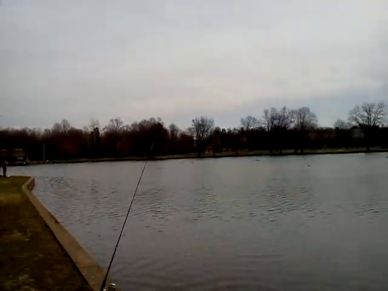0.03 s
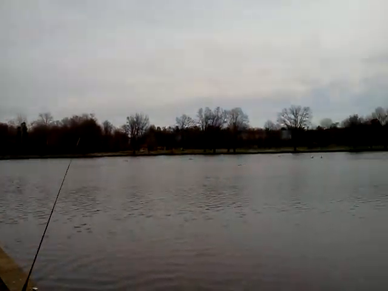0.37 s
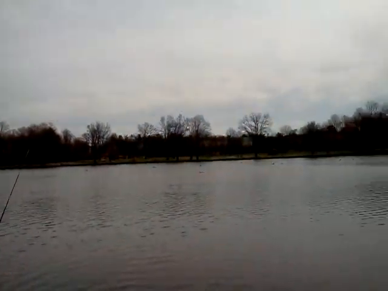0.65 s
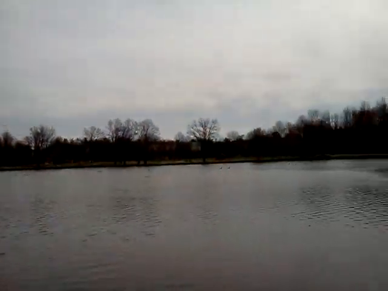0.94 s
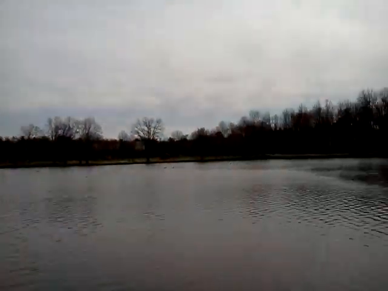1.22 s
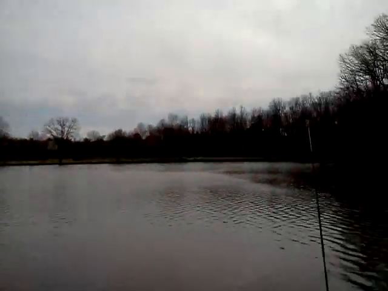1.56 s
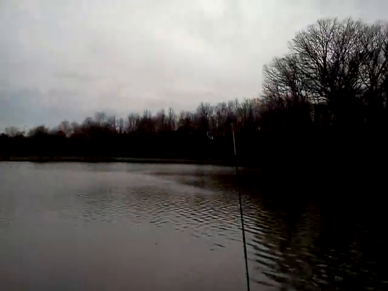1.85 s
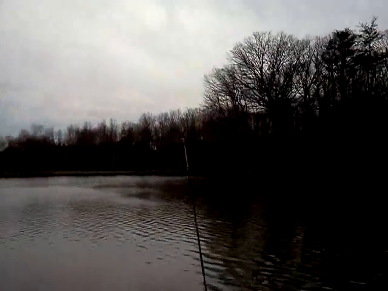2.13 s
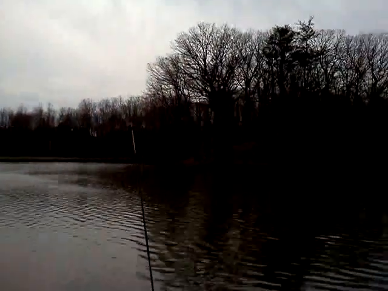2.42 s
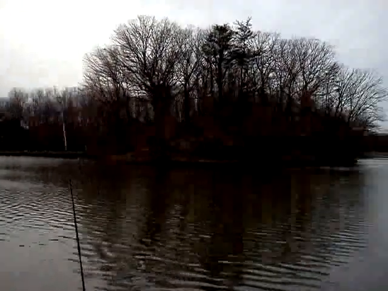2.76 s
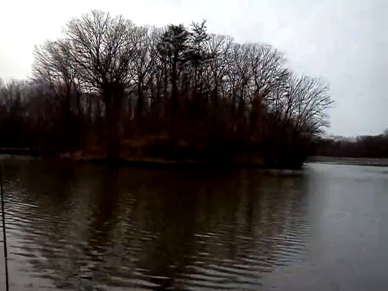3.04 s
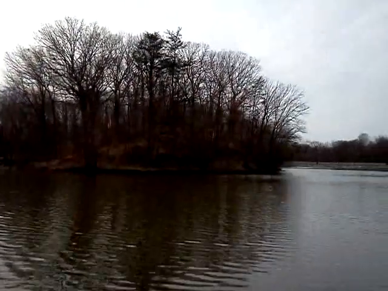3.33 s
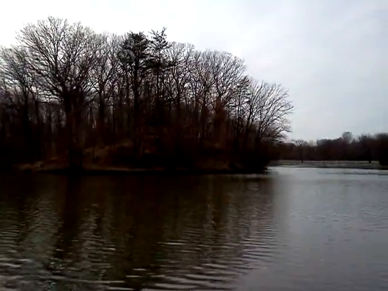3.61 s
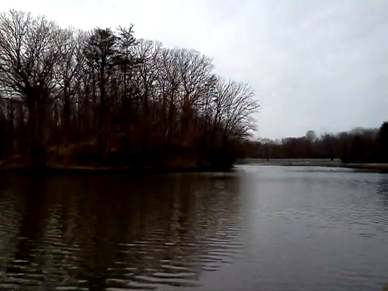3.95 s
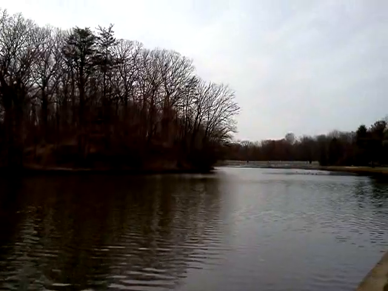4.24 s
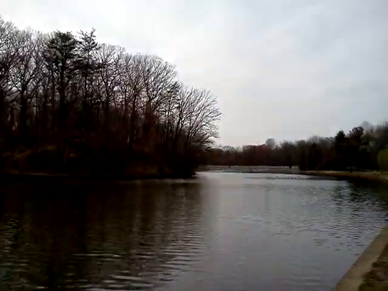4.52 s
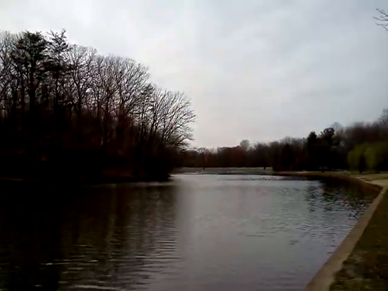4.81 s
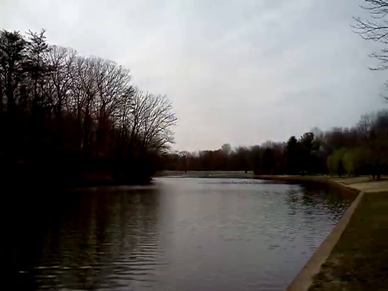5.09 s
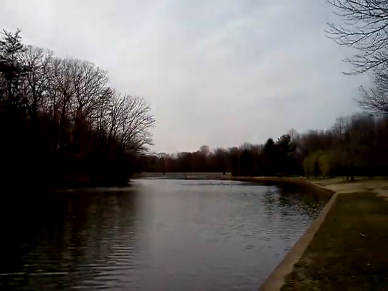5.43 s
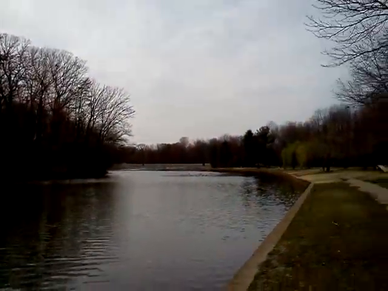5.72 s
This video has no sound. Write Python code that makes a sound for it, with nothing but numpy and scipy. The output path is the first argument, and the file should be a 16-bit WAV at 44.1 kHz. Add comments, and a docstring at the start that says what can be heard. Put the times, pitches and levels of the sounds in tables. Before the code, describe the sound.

Geese honk across a pond, two close and a flock farther off, while wind gusts buffet the microphone.

```python
"""Geese honk across a pond: two near birds trade clear falling honks, a deeper one draws out long calls,
and the flock answers and grunts from farther off. Each voice is a source and a filter: harmonics of
the syrinx, shaped by the throat. The wooded banks reflect the calls over a steady murmur, and there
is one faint tick. Turbulent wind buffets the microphone at the start and again near the end, where
it overloads and crackles."""
import sys
import numpy as np
from scipy import signal
from scipy.fft import rfft, irfft
from scipy.io import wavfile

SR = 44100
rng = np.random.default_rng(int(sys.argv[2]) if len(sys.argv) > 2 else 0)


def wav_record(signal):
    """Record a signal, one row per channel, as 16-bit PCM in the file named by sys.argv[1]."""
    frames = np.transpose(np.atleast_2d(signal))
    bounded = np.clip(frames, -1, 1)
    # unit amplitude maps onto the largest positive 16-bit level
    quanta = np.round(bounded * 32767).astype(np.int16)
    wavfile.write(sys.argv[1], SR, quanta)


N = 263040
TIME = np.arange(N) / SR

# honks of the near pair: start_s, length_s, pitch_hz, level_db, sag_fraction, fade_db, treble_db, bird
NEAR_HONKS = [ (0.088, .076, 680, -14, .068, 6.5, 10.5, "round"),
              (0.549, .072, 683.6, -14, 0.034, 2, -5, "round"),
              (1.211, 0.089, 651.2, -13.5, .048, 13, 3, "brassy"),
              (1.726, .087, 659.6, -12, .045, 10, -4, "brassy"),
              (2.3, 0.091, 679.2, -14, .02, 2.5, -3, "round"),
              (3.092, .106, 669.8, -16, .028, 2, -3, "round"),
              (3.508, .076, 687, -19.5, 0.021, -3, 6.5, "round"),
              (4.173, .083, 656, -12.5, 0.054, 9, -6.5, "brassy"),
              (4.621, 0.076, 659.3, -13.5, .008, 5, 2.5, "round")]
# calls of the deep goose: start_s, length_s, low_note_s, level_db, treble_db
LONG_CALLS = [(3.685, 0.24, .11, -28, -13), (4.728, 0.14, .064, -23, -8), (5.388, .23, .076, -21.5, 15.5)]
# short calls of the flock: start_s, length_s, pitch_hz, level_db
FLOCK_ANSWERS = [ (0.176, .07, 652.4, -45), (0.262, .075, 757, -30.5), (0.479, 0.03, 680, -21),
                 (0.500, 0.061, 593, -29), (0.684, 0.038, 685.3, -25), (0.818, .065, 506.5, -33),
                 (0.938, 0.087, 604, -38.5), (1.424, 0.082, 756, -24), (1.504, 0.088, 666, -36.5),
                 (1.628, .065, 635, -28), (1.814, 0.064, 692, -26.5), (2.143, 0.055, 661.5, -33.5),
                 (2.222, 0.024, 666, -24.5), (2.23, .07, 760.7, -22), (2.433, 0.1, 681.3, -32.5),
                 (2.526, 0.11, 699, -33), (2.611, 0.13, 677.4, -35), (2.697, 0.042, 465.4, -31),
                 (2.741, .046, 612, -28), (2.879, 0.046, 656, -37), (3.02, 0.018, 648, -26.5),
                 (3.122, 0.079, 754, -26), (3.16, 0.051, 492.4, -34), (3.238, .049, 705, -24.5),
                 (3.431, 0.044, 768, -29.5), (3.498, 0.036, 588, -24), (3.559, .035, 667, -23),
                 (4.091, 0.1, 633, -27.5), (4.254, .041, 427.6, -31.5), (4.319, .061, 626, -28),
                 (4.555, 0.028, 645, -27.5), (4.829, 0.052, 698.6, -27), (5.386, .016, 620, -26.5),
                 (5.415, 0.075, 681, -35.5), (5.841, .063, 693, -36), (5.896, 0.05, 764, -36.5)]
FLOCK_GRUNTS = [(0.01, .035, 655, -34.5), (0.805, 0.035, 661, -31.5), (1.124, .05, 568.3, -32.5),
                (1.584, .06, 464, -32), (2.499, .06, 612, -30), (3.034, 0.073, 549, -30),
                (3.437, 0.038, 581, -30.5), (3.922, 0.036, 644, -30.5), (4.283, .092, 657, -34.5)]
# throat filters: frequency_hz, relative_gain_db
ROUND_THROAT = [(550, -9.5), (670, -15), (1000, -7), (1300, 4), (1450, -6), (1850, -14), (2030, -25),
                (2400, -33), (2700, -55.5), (3100, -42), (3350, -40), (3550, -45.5), (4000, -65.5)]
BRASSY_THROAT = [(550, -7.5), (650, -18.5), (1000, -2.5), (1300, 1), (1700, -7), (1930, -16), (2250, -30.5),
                 (2560, -24), (2750, -36), (3250, -44), (3850, -65.5), (4500, -77)]
DEEP_THROAT = [(430, -1.5), (500, -11), (900, 8.5), (1000, 3.5), (1480, -2.5), (1980, -21), (2500, -43),
               (3000, -44), (3400, -55.5), (4500, -68.5)]
FLOCK_THROAT = [(450, -3.5), (680, -9.5), (780, -12), (1000, 11.5), (1330, 1.5), (1520, 7), (1750, -19),
                (2050, -25.5), (2400, -41.5), (3300, -49.5), (4500, -58.5)]
# band over which a call's treble lift comes in: lower_hz, upper_hz
TREBLE_RAMP_HZ = [1510, 2975]
# air rasping through the syrinx: frequency_hz, relative_density_db
RASP_SPECTRUM = [(150, -29.5), (400, -14), (600, -13.5), (1300, 4.5), (1650, 0.5), (2100, -4),
                 (2800, -16.5), (3400, -20), (4000, -26)]
# loudness contour of the far flock, taken relative to its mean: time_s, level_db
FAR_CONTOUR = [(0.0, -37), (1.19, -38), (1.38, -37.5), (2.11, -38), (2.42, -34), (2.95, -38), (3.19, -37),
               (4.81, -34), (4.95, -42.5), (5.96, -38.5)]
# reflections from the shore and banks: delay_s, gain_db
BANK_ECHOES = [(0.024, -25), (0.086, -25.5), (0.171, -25.5), (.27, -22.5), (0.429, -29)]
# gusts of wind: start_s, peak_s, peak_db, decay_s
GUSTS = [(0.084, 0.142, -34.5, 0.011), (0.294, 0.337, -24, 0.02), (0.696, 0.729, -20.5, 0.016),
         (0.792, 0.84, -31, 0.083), (4.495, 4.662, -18.5, 0.024), (4.853, 5.176, -10.5, 0.061),
         (5.332, 5.52, -29.5, .2), (5.69, 5.815, -19.5, 0.019)]
# strongest eddies hitting the microphone port: start_s, peak_db, swell_s
BUFFETS = [ (0.049, -30, 0.0022), (0.159, -26.5, 0.0033), (0.229, -25, 0.0035), (0.324, -9.5, 0.0016),
           (0.407, -17, 0.0026), (0.461, -16, 0.0035), (0.608, -4.5, 0.0015), (0.736, -14, 0.0034),
           (0.808, -16.5, 0.0023), (0.842, -16, .0034), (0.98, -25.5, 0.0027), (1.018, -24.5, 0.0039),
           (2.986, -27, 0.0021), (3.999, -13, 0.002), (4.411, -20.5, 0.0023), (4.49, -17, 0.0027),
           (4.561, -17.5, 0.0058), (4.622, -10.5, 0.0069), (4.815, -19, 0.002), (4.856, -2.2, .0018),
           (4.952, -3.2, .0022), (5.058, -4.5, .003), (5.113, -6, .002), (5.164, 1.5, .011),
           (5.202, -3, .003), (5.004, -10, 0.0016), (5.031, -7, .0025), (5.396, -19, 0.0042),
           (5.611, -11.5, 0.0013), (5.671, -16.5, 0.0033), (5.720, -6.5, 0.002), (5.805, -11.5, 0.006)]
# turbulence, and the finer whirls of hard gusts: frequency_hz, relative_density_db
TURBULENCE_SPECTRUM = [(25, -33), (60, -15.5), (120, -21.5), (190, -1), (270, 1), (350, -2), (500, -10),
                       (700, -33), (1000, -34.5), (2000, -46), (3500, -53)]
WHIRL_SPECTRUM = [(200, -38), (450, 13.5), (700, 2), (1000, -17.5), (1500, -30.5), (3500, -44.5)]
# a dry tick: frequency_hz, relative_density_db
TICK_SPECTRUM = [(500, -15), (1500, 23), (2400, 16), (4000, -6.5)]
# the farthest birds blended with open air: frequency_hz, relative_density_db
MURMUR_SPECTRUM = [(18, -74.5), (30, -33), (136, -28), (280, -18), (384, -22.5), (467, -12), (546, -17.5),
                   (651, -9), (840, -16), (1110, -9.5), (1320, -7), (1540, -13), (1670, -18.5),
                   (2720, -38.5), (3250, -33), (4220, -61.5), (7150, -120)]


def near_goose(name, throat, attack_s=.0065, release_s=.032):
    """Coupled pitch and amplitude modulation: a honk scoops up, sags, then collapses in both."""
    out = np.zeros(N)
    for start, length, pitch, level, sag, fade, treble, bird in NEAR_HONKS:
        if bird != name:
            continue
        t = span(start, length)
        age = t - start
        opening = np.exp(-age / attack_s)
        closing = np.clip(1 - (length - age) / release_s, 0, 1) ** 1.4
        glide = 1 - .015 * opening - sag * age / length - .092 * closing
        envelope_db = level - 10 * opening - fade * age / length - 11 * closing
        tone = voice(t, pitch * glide, shelve(throat, treble), jitter=.0039, shimmer=.013, edge_s=.0021)
        add(out, t, tone * from_db(envelope_db))
    return out


def voice(t, pitch_hz, throat, jitter, shimmer, edge_s):
    """Source and filter: the throat weights eight harmonics of the syrinx, whose cycles are unsteady."""
    pitch_hz = pitch_hz * (1 + jitter * flutter(t, 420))
    phase = 2 * np.pi * np.cumsum(pitch_hz) / SR
    harmonic = np.arange(1, 9)[:, None]
    gains = from_db(at_hz(throat, np.maximum(harmonic * pitch_hz, 1)))
    gains /= np.sqrt(np.sum(gains ** 2, axis=0) / 2)  # unit rms
    offsets = rng.uniform(0, 2 * np.pi, harmonic.shape)
    tone = np.sum(gains * np.sin(harmonic * phase + offsets), axis=0)
    gate = np.clip(np.minimum(t - t[0], t[-1] - t) / edge_s, 0, 1)
    return tone * gate * (1 + shimmer * flutter(t, 500))


def shelve(throat, treble_db):
    """Shelving filter: lifts or lowers the upper part of a throat's response."""
    return [(hz, db + treble_db * np.interp(hz, TREBLE_RAMP_HZ, [0, 1])) for hz, db in throat]


def with_rasp(calls, level_db):
    """Pulse-modulated noise: each pulse of a call lets a puff of rough air through the throat."""
    puffs = np.maximum(calls, 0) * rng.standard_normal(N)
    return calls + colour(puffs, RASP_SPECTRUM) * from_db(level_db)


def deep_goose(low_hz=440, high_hz=500, break_s=.011, sag_hz_per_s=61, fade_db_per_s=31.5):
    """Register break: a soft low note jumps to a louder, higher one that slowly sags and fades."""
    out = np.zeros(N)
    for start, length, low_note_s, level, treble in LONG_CALLS:
        t = span(start, length)
        since_break = t - start - low_note_s
        high = .5 + .5 * np.tanh(since_break / break_s)
        held_s = np.maximum(since_break, 0)
        slack = np.exp(-np.minimum(t - start, t[-1] - t) / .012)  # both ends are lower and softer
        pitch = low_hz + (high_hz - low_hz) * high - sag_hz_per_s * held_s - 24 * slack
        envelope_db = level - 8 * (1 - high) - fade_db_per_s * held_s - 12 * slack
        tone = voice(t, pitch, shelve(DEEP_THROAT, treble), jitter=.007, shimmer=.08, edge_s=.004)
        add(out, t, tone * from_db(envelope_db))
    return out


def flock(fall_per_s=.8, croak_lead_s=.033, croak_overlap_s=.014):
    """Superposition of answers, grunts and the low croak that leads into each near honk and answer."""
    out = np.zeros(N)
    for start, length, pitch, level in FLOCK_ANSWERS:
        t = span(start, length)
        add(out, t, flock_honk(t, pitch, fall_per_s * length) * from_db(level))
    for start, length, pitch, level in FLOCK_GRUNTS:
        t = span(start, length)
        add(out, t, grunt(t, pitch) * from_db(level))
    for calls, croak_db in ((NEAR_HONKS, -10.5), (FLOCK_ANSWERS, -14)):
        for start, _, pitch, level, *_ in calls:
            t = span(start - croak_lead_s, croak_lead_s + croak_overlap_s)
            croak = grunt(t, .81 * pitch) * np.linspace(0, 1, len(t))
            add(out, t, croak * from_db(level + croak_db))
    return out


def flock_honk(t, pitch_hz, fall_fraction):
    """Frequency glide: a short call scoops up to its pitch, then falls as it fades."""
    progress = np.linspace(0, 1, len(t))
    glide = 1 - .025 * np.exp(-7 * progress) - fall_fraction * progress ** 3
    tone = voice(t, pitch_hz * glide, FLOCK_THROAT, jitter=.008, shimmer=.14, edge_s=.005)
    return tone * from_db(-5 * progress ** 3)


def grunt(t, pitch_hz):
    """Aperiodic vibration: cycles very uneven in period and amplitude sound hoarse."""
    return voice(t, pitch_hz, FLOCK_THROAT, jitter=.045, shimmer=.38, edge_s=.012)


def far_flock(count=90, lowest_hz=645, spread_hz=150):
    """Attenuation with distance: birds call in loose turns, the farther ones fainter."""
    out = np.zeros(N)
    for turn, (when, size, register, distance) in enumerate(rng.random((count, 4))):
        t = span((turn + when) / count * N / SR, .05 + .06 * size)
        call = flock_honk(t, lowest_hz + spread_hz * register, fall_fraction=.07)
        add(out, t, call * from_db(-38 - 15.5 * distance))
    return out


def far_activity():
    """Slow amplitude modulation: the gain of the far flock as it livens up and settles."""
    level_db = np.interp(TIME, *np.transpose(FAR_CONTOUR))
    return from_db(level_db - level_db.mean())


def bank_reflections(calls, decay_db_per_s=60, scatter_db=-15):
    """Reflection and scattering: distinct echoes from the shore and a diffuse tail from the trees."""
    t = span(0, .78)
    response = rng.standard_normal(len(t)) * from_db(-decay_db_per_s * t) * np.minimum(t / .03, 1)
    response *= from_db(scatter_db) / np.linalg.norm(response)
    for delay, gain_db in BANK_ECHOES:
        add(response, [delay], from_db([gain_db]))
    return signal.fftconvolve(calls, response)[:N]


def wind(eddy_count=130, eddy_swell_s=.0075):
    """Turbulent pressure at the microphone: gusts carry a rumble, small eddies and hard buffets."""
    gust = gust_envelope()
    gust_db = 20 * np.log10(gust + 1e-9)
    eddies = [(when * N / SR, gust_db[int(when * N)] - 4.5 + 7 * size, eddy_swell_s)
              for when, size in rng.random((eddy_count, 2))]
    small_thumps, _ = thumps(eddies)
    hard_thumps, push = thumps(BUFFETS)
    force = gust * from_db(2 * flutter(TIME, 70)) + .1 * push
    rumble = force * noise(TURBULENCE_SPECTRUM)
    whirls = from_db(2) * force ** 1.845 * noise(WHIRL_SPECTRUM)
    # soft saturation rounds these peaks, so the overload comes with the hard thumps
    rounded = .55 * np.tanh((rumble + whirls + small_thumps) / .55)
    return signal.sosfilt(signal.butter(2, 75, "high", fs=SR, output="sos"), rounded + hard_thumps)


def gust_envelope(onset_s=.0027, build_db=12):
    """Exponential growth and decay: each gust sets in abruptly, builds to a peak and dies away."""
    envelope = np.zeros(N)
    for start, peak_s, peak_db, decay_s in GUSTS:
        onset = np.clip((TIME - start) / onset_s, 0, 1)
        build = from_db(peak_db + np.interp(TIME, [start, peak_s], [-build_db, 0]))
        decay = np.exp(-np.maximum(TIME - peak_s, 0) / decay_s)
        envelope += onset * build * decay
    return envelope


def thumps(eddies, full_scale_hz=297.2, hz_per_db=3):
    """Damped oscillation: each eddy thumps, weaker ones lower. Returns the sound and its envelope."""
    sound, force = np.zeros(N), np.zeros(N)
    for start, level, swell_s in eddies:
        t = span(start, .08)
        age = t - start
        push = from_db(level) * age / swell_s * np.exp(1 - age / swell_s)
        settled_hz = full_scale_hz + hz_per_db * level
        cycles = settled_hz * (age + .0016 * (1 - np.exp(-age / .0019)))  # starts high, then drops
        add(sound, t, push * np.sin(2 * np.pi * cycles))
        add(force, t, push)
    return sound, force


def tick(start_s=4.452, level_db=-36, t60_s=.044):
    """A transient: a faint, dry burst of noise close by decays exponentially."""
    age = np.maximum(TIME - start_s, 0)
    return noise(TICK_SPECTRUM) * from_db(level_db - 60 * age / t60_s) * (age > 0)


def murmur():
    """Incoherent summation: the farthest birds and the open air merge into unevenly swelling noise."""
    return noise(MURMUR_SPECTRUM) * from_db(-41.5 + 2.9 * flutter(TIME, 18))


def noise(spectrum):
    """Stationary Gaussian noise with a given spectrum and an rms near 1."""
    return colour(rng.standard_normal(N), spectrum)


def colour(white, spectrum):
    """Spectral shaping: filters a white signal while conserving its power."""
    gain = from_db(at_hz(spectrum, np.maximum(np.fft.rfftfreq(N, 1 / SR), 1)))
    return irfft(rfft(white) * gain / np.sqrt(np.mean(gain ** 2)), N)


def flutter(t, rate_hz):
    """Random modulation: straight lines join Gaussian values drawn rate_hz times a second."""
    return np.interp((t - t[0]) * rate_hz + rng.random(), np.arange(2048), rng.normal(0, 1.75, 2048))


def at_hz(spectrum, hz):
    """Interpolation of a spectrum's level on a logarithmic frequency axis."""
    frequency_hz, level_db = np.transpose(spectrum)
    return np.interp(np.log(hz), np.log(frequency_hz), level_db)


def from_db(db):
    """Decibels to amplitude ratio."""
    return 10 ** (np.asarray(db) / 20)


def span(start_s, length_s):
    """Uniform sampling: the sample times of one event."""
    return start_s + np.arange(max(int(length_s * SR), 8)) / SR


def add(out, t, sound):
    """Superposition: mixes a sound in from time t[0]."""
    first = max(int(t[0] * SR), 0)
    out[first:first + len(sound)] += sound[:max(N - first, 0)]


def scene():
    """Linear superposition of the geese, their reflections, the murmur, the wind and the tick."""
    round_goose = with_rasp(near_goose("round", ROUND_THROAT), level_db=-20)
    brassy_goose = with_rasp(near_goose("brassy", BRASSY_THROAT), level_db=-18)
    long_calls = with_rasp(deep_goose(), level_db=-16.5)
    answers = with_rasp(flock(), level_db=-19.5)
    activity = far_activity()
    geese = round_goose + brassy_goose + long_calls + answers + activity * far_flock()
    return (geese + bank_reflections(geese) + activity * murmur() + wind() + tick())[None]


def record(dry, microphone_top_hz=3780, ceiling=.69, cutoff_hz=15600):
    """Band limiting and clipping: a dull microphone overloads and crackles in the strongest gusts."""
    dull = signal.sosfilt(signal.cheby1(8, .2, microphone_top_hz, fs=SR, output="sos"), dry)
    clipped = np.clip(dull, -ceiling, ceiling)
    return signal.sosfilt(signal.cheby1(10, .2, cutoff_hz, fs=SR, output="sos"), clipped)


dry = scene()
out = record(dry)
wav_record(out)
```